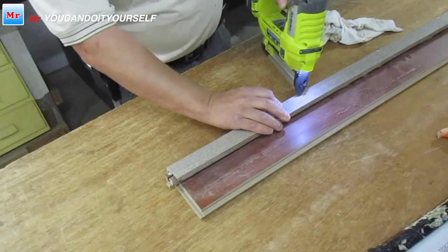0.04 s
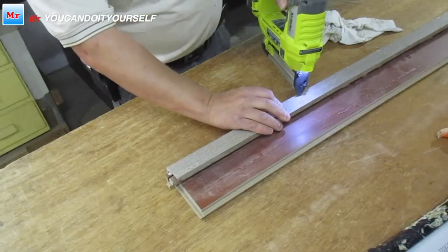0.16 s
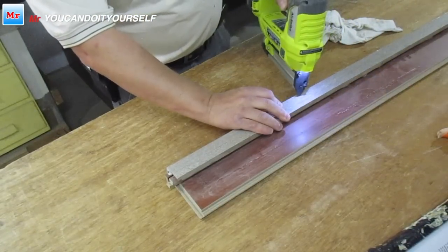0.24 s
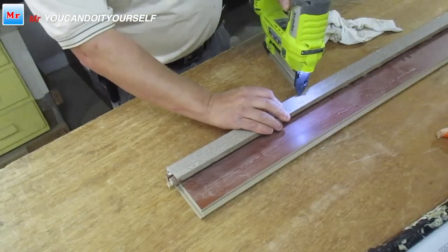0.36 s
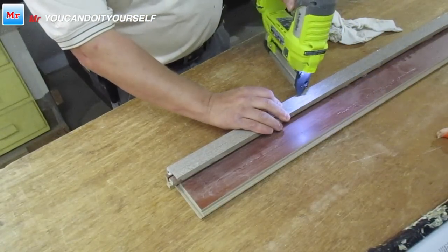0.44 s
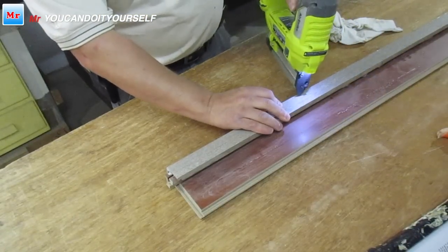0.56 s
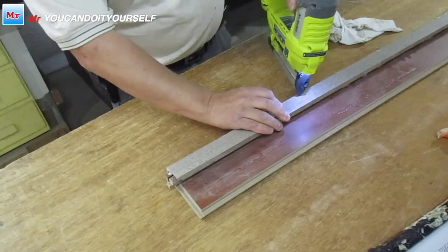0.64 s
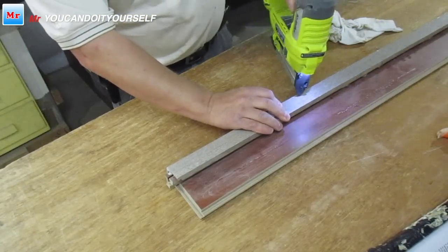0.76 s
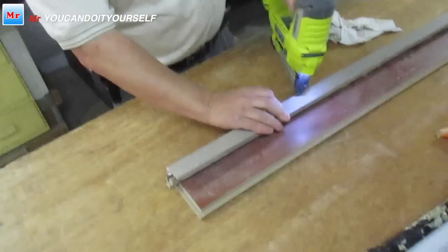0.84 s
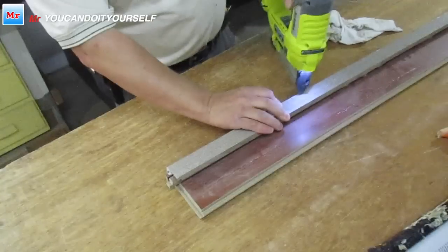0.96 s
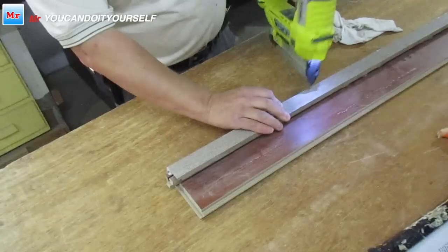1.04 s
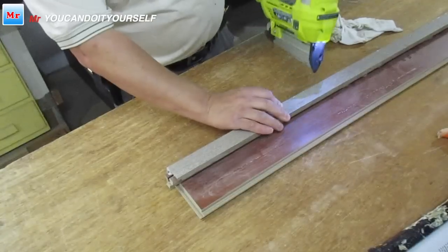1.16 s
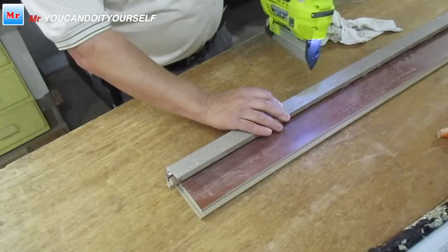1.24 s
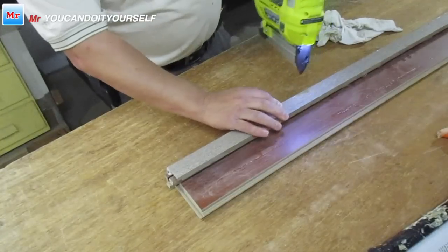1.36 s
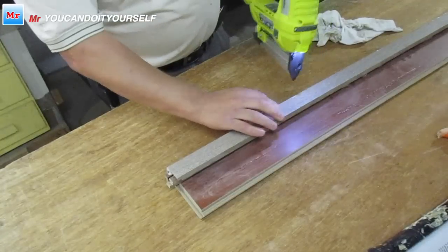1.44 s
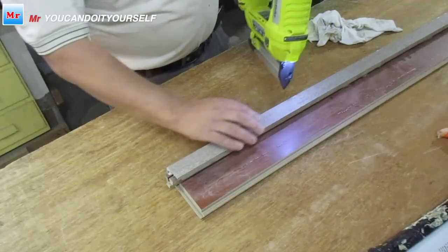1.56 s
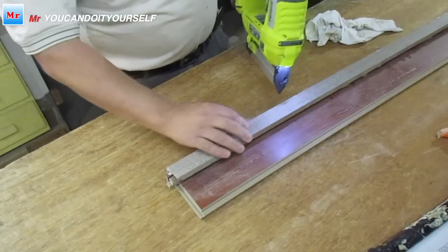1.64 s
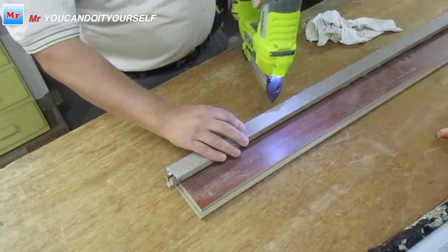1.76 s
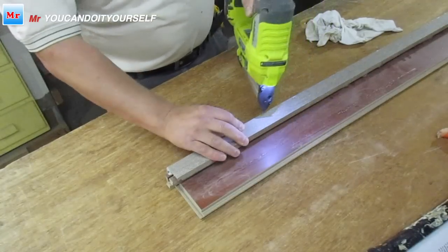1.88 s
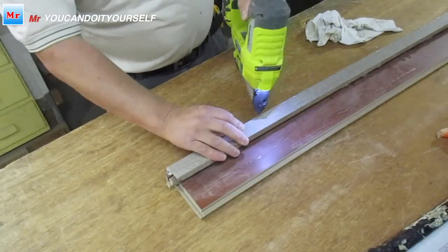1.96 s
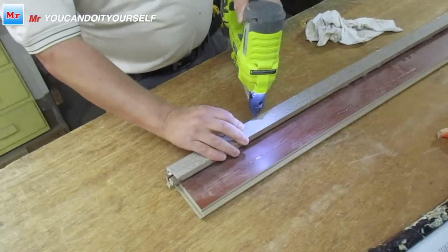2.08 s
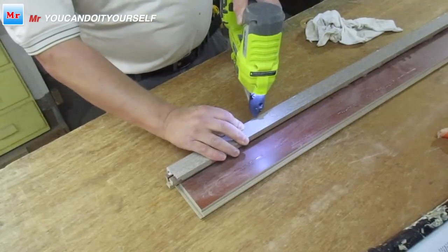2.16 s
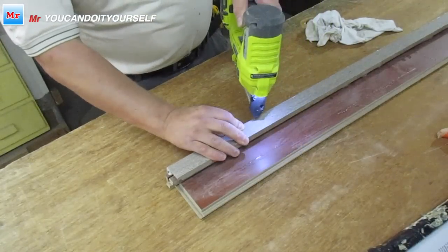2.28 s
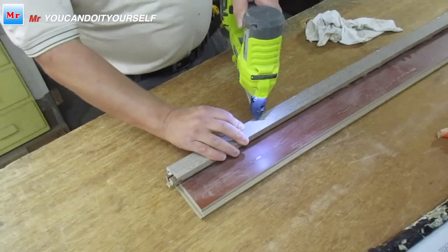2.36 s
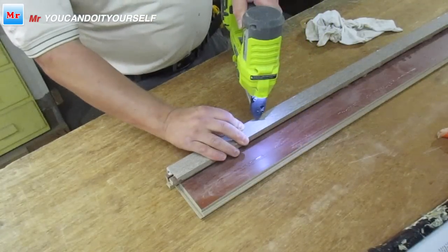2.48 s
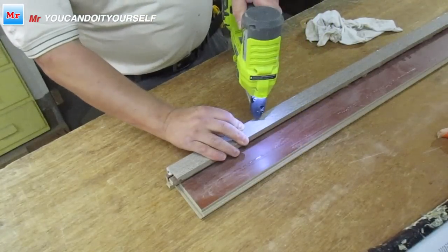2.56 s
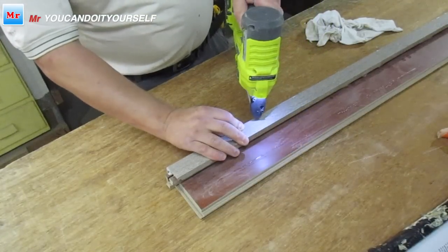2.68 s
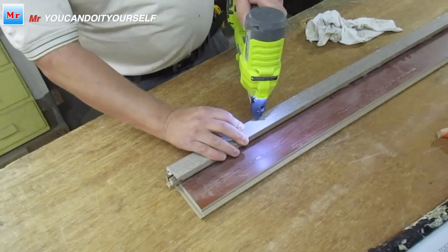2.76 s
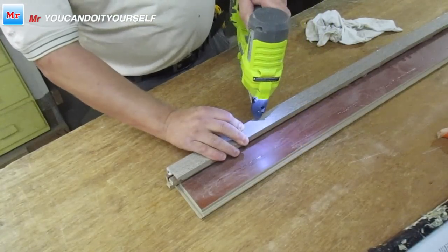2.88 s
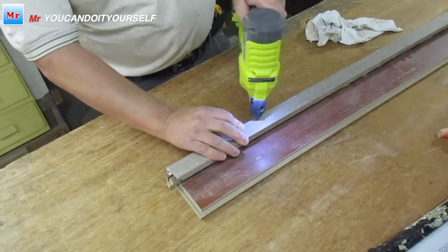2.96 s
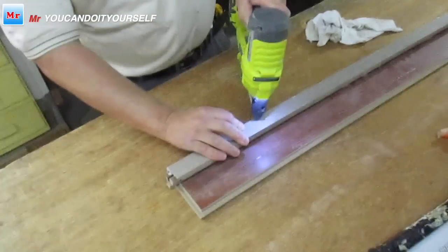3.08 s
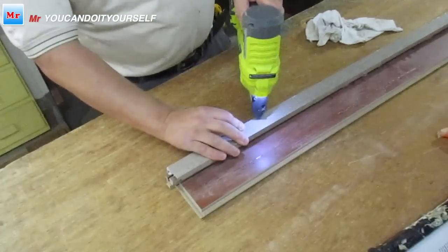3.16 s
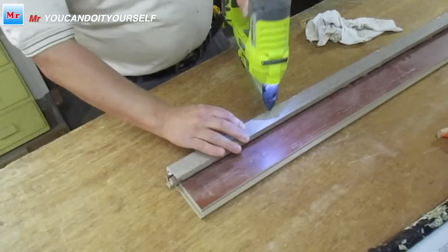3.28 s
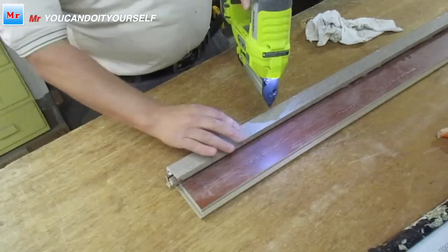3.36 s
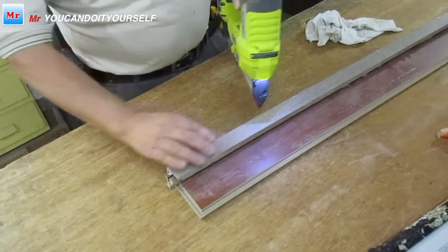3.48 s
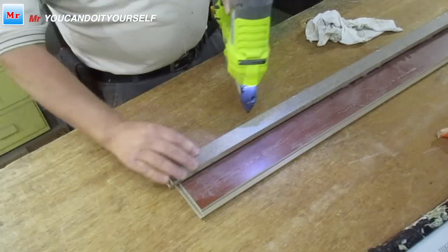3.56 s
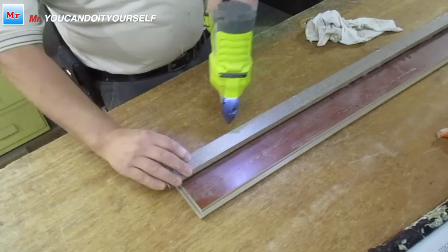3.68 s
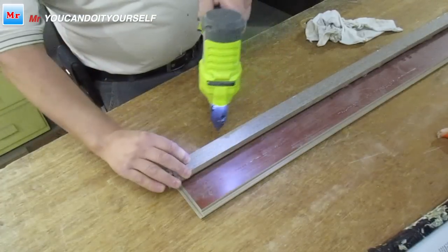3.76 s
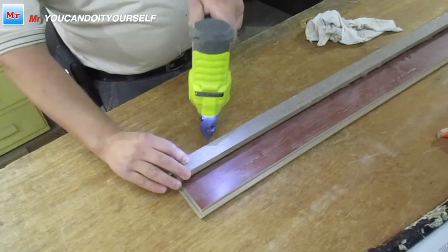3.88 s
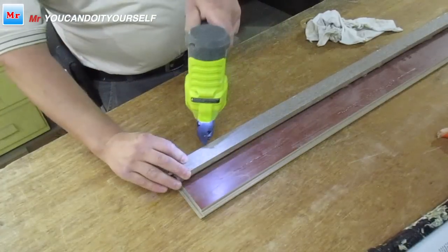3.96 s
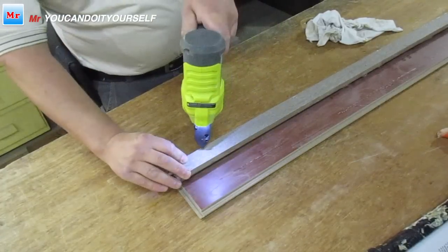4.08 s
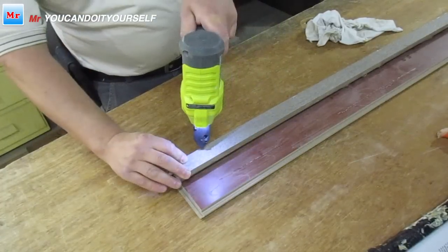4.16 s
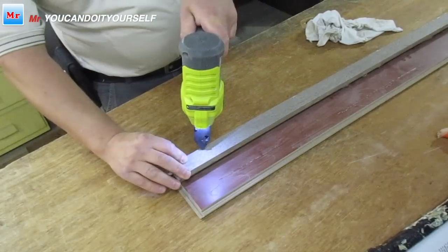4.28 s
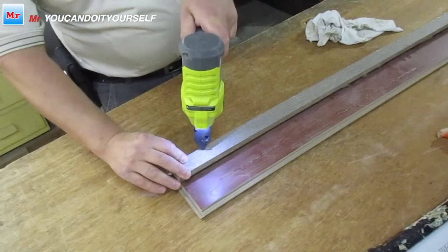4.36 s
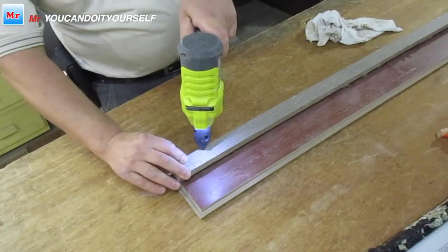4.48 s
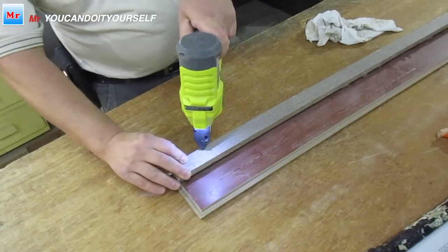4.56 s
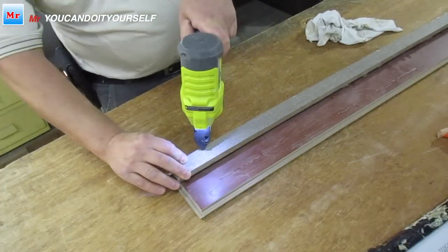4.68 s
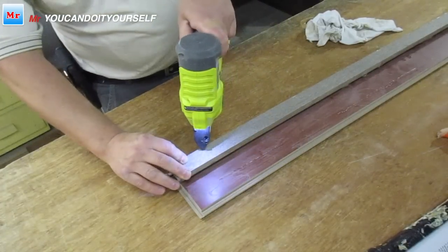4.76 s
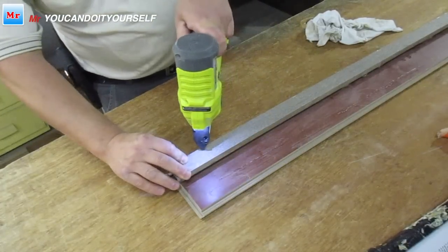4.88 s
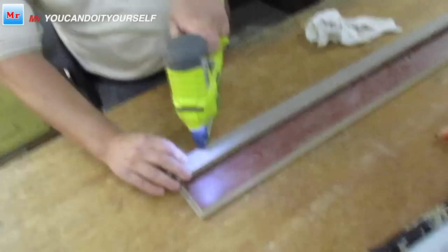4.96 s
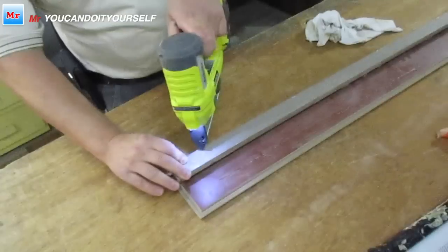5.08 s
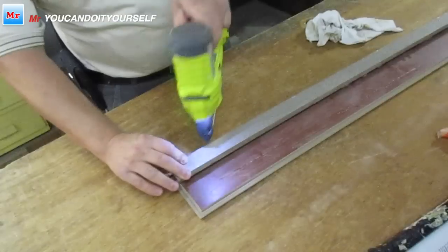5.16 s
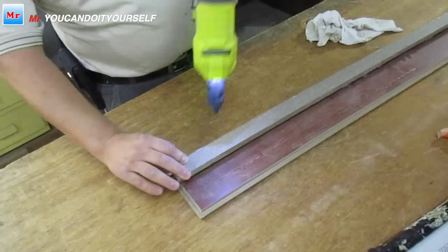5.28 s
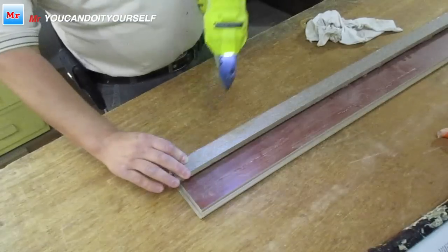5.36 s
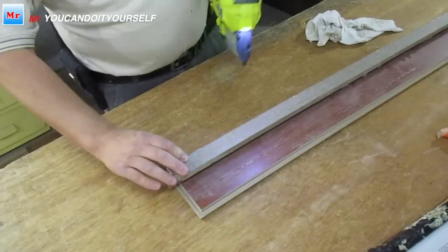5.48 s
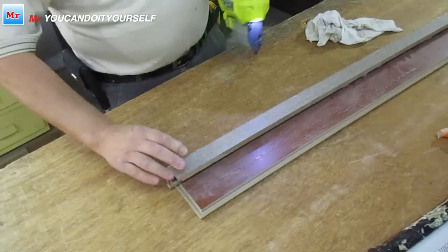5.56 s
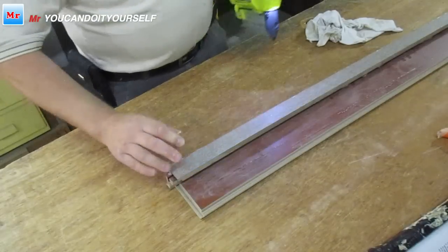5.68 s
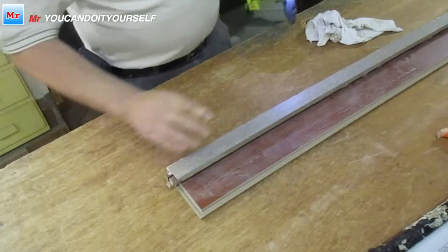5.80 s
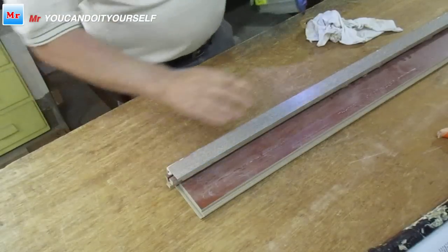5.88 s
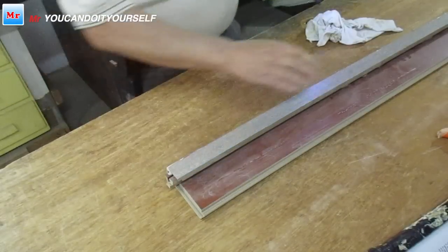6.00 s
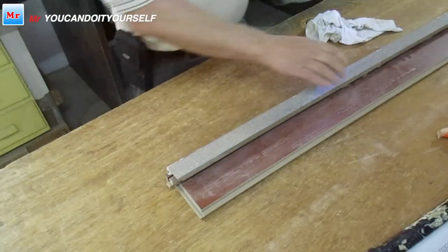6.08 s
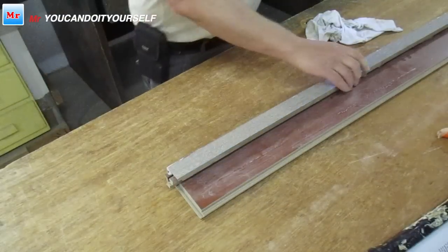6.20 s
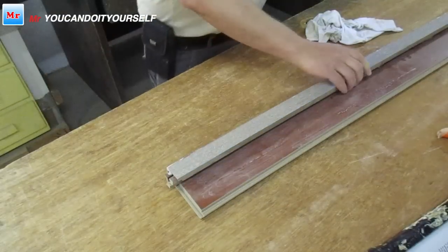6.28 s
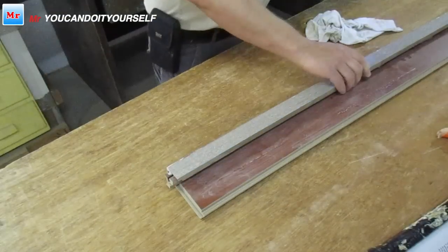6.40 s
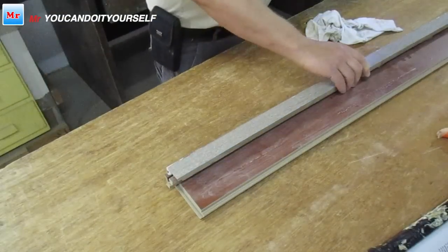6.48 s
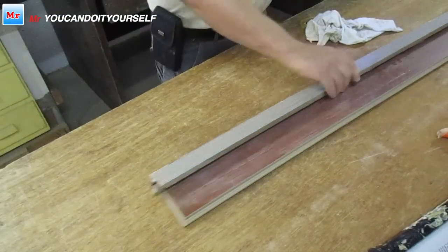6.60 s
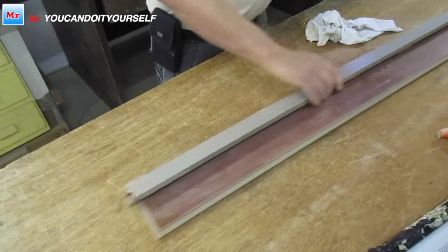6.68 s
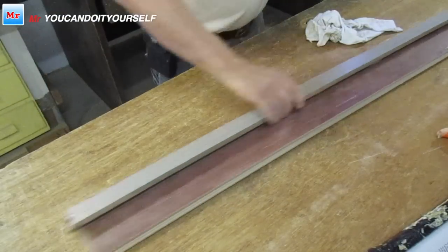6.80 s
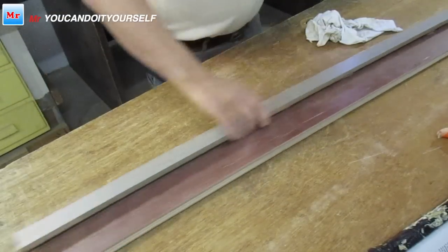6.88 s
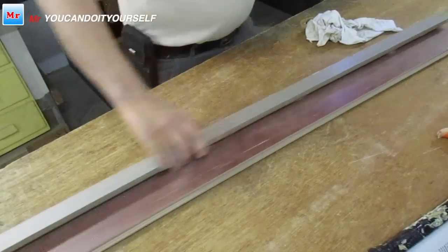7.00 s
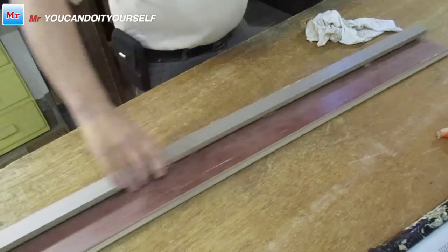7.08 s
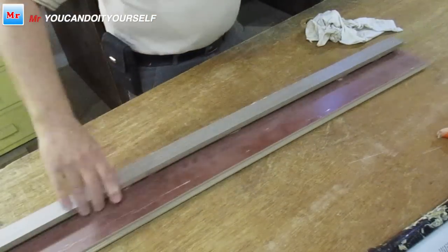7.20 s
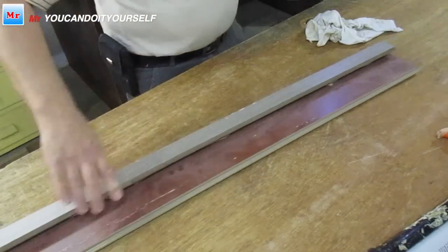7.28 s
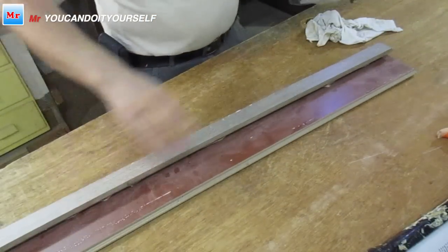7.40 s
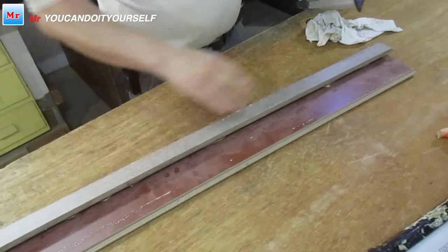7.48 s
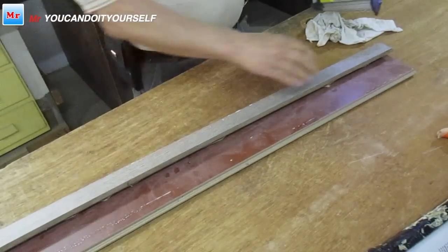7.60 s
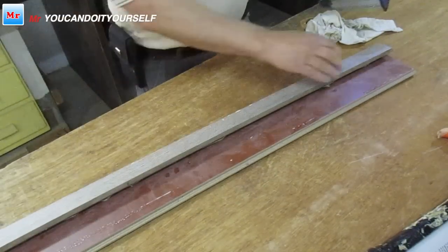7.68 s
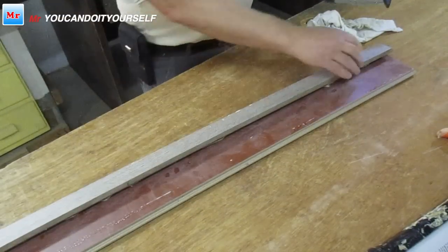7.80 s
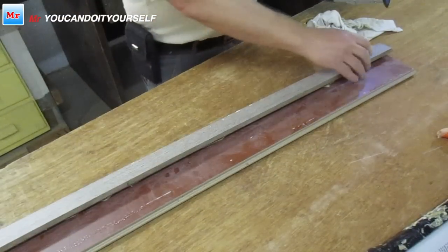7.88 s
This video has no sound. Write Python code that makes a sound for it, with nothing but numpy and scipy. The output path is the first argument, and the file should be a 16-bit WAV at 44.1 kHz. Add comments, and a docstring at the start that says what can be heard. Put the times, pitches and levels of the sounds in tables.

```python
"""A cordless pin nailer fixes a thin strip on a wooden bench in a bare, ringing workshop with a faint hum.
Three times the nose is set down, the trigger clicks, a geared motor winds the piston against an air
spring and the driver snaps a pin home (0.9, 3.0, 5.0 s). At 6.1 s a hand taps the strip.
From 6.6 s the workpiece slides along the bench, rubbing and faintly squeaking. Fingers brush it last."""
import sys
import numpy as np
from scipy import signal
from scipy.fft import rfft, irfft
from scipy.io import wavfile

SR = 44100
rng = np.random.default_rng(int(sys.argv[2]) if len(sys.argv) > 2 else 0)


def wav_out(sig):
    """Save sig, one row per channel (or a flat mono array), as 16-bit PCM at SR to the path in sys.argv[1]."""
    wavfile.write(sys.argv[1], SR, np.round(np.clip(np.atleast_2d(sig).T, -1, 1) * 32767).astype(np.int16))


N = 350154
T = np.arange(N) / SR

# firings: (time [s], blow [dB], room [dB], crack in room [dB], gears [dB], whine [dB],
#           wind-up length [s], trigger time [s], trigger [dB])
SHOTS = [(0.853, -2.5, -11.5, -14, -2, -0.5, 0.15, .629, -24.5),
         (3.0442, -3, -12.5, -3, -7.5, -10.5, .1493, 2.814, -42),
         (5.0208, -4, -11, 2.5, -10.5, -16, .1487, 4.7865, -33)]
# rubbing on wood: (frequency [Hz], level [dB])
RUB_SPECTRUM = [(40, -18), (120, -9.5), (200, 1.5), (450, 5.5), (800, 6), (1300, 0.5), (2200, -6),
                (3500, -12.5), (6000, -32.5), (10000, -27.5), (15000, -40)]


def undb(db):
    """Decibels to gain."""
    return 10 ** (np.asarray(db) / 20)


def at_hz(points, f):
    """Interpolate (Hz, value) points over log frequency."""
    hz, value = np.transpose(points)
    return np.interp(np.log(np.maximum(f, 1)), np.log(hz), value)


def colour(x, spectrum, size=4096):
    """Minimum-phase filter of unit power with the given spectrum."""
    gain = undb(at_hz(spectrum, np.fft.rfftfreq(size, 1 / SR)))
    cepstrum = irfft(np.log(gain / np.sqrt(np.mean(gain ** 2))))
    cepstrum[1:size // 2] *= 2
    cepstrum[size // 2 + 1:] = 0
    return signal.fftconvolve(x, irfft(np.exp(rfft(cepstrum))))[:len(x)]


def fade(t, t60_s):
    """Exponential decay from t = 0."""
    return (t >= 0) * np.exp(-np.log(1000) * np.maximum(t, 0) / t60_s)


def gate(start_s, end_s, attack_s, release_s):
    """Rise from start_s, hold, fall after end_s."""
    return np.clip((T - start_s) / attack_s, 0, 1) * np.clip(1 - (T - end_s) / release_s, 0, 1)


def noise(t):
    """White noise as long as t."""
    return rng.standard_normal(len(t))


def wander(t, rate_hz):
    """Random values joined by ramps, spread near 1."""
    steps = rng.standard_normal(len(t) // 8)
    return np.interp(t * rate_hz, np.arange(len(steps)), steps)


def pulse(t, db):
    """Impulse at the start of t."""
    return undb(db) * signal.unit_impulse(len(t))


def ring(t, modes):
    """Decaying sines of a struck resonator."""
    return sum(undb(db) * np.sin(2 * np.pi * hz * t) * fade(t, t60_s) for hz, db, t60_s in modes)


def add(out, at_s, x):
    """Mix x into out."""
    i = max(int(at_s * SR), 0)
    out[i:i + len(x)] += x[:N - i]


def background(floor_db=-58, hum_hz=136.0, hum_db=-62):
    """Steady room noise and a faint, wavering hum."""
    # room noise: (frequency [Hz], level [dB])
    floor_spectrum = [(15, -43), (25, -0.5), (86, -5.5), (133, 5.5), (253, -15.5), (349, -7), (567, -16.5),
                      (648, -31.5), (722, -10.5), (1490, -13), (1620, -9.5), (2120, -25), (2770, -23),
                      (14300, -39), (15500, -44.5)]
    hum = np.sin(2 * np.pi * hum_hz * T + .4 * wander(T, 4)) * undb(2 * wander(T, 0.97))
    return undb(floor_db) * colour(noise(T), floor_spectrum) + undb(hum_db) * hum


def room_response(bass_build_s=0.019, treble_build_s=0.00094, bands=18):
    """Diffuse reflections: lows come late and stay, treble dies first."""
    # reverberation: (frequency [Hz], t60 [s])
    decay_times = [(60, 1.2), (150, 2.33), (300, 1.71), (700, 1.75), (1800, 1.516), (4800, 1.1),
                   (8000, 0.69), (14000, 0.46)]
    t = T[:int(2.5 * SR)]
    spectrum = rfft(noise(t))
    log_hz = np.log(np.maximum(np.fft.rfftfreq(len(t), 1 / SR), 1))
    centres_hz = np.geomspace(50, 16000, bands)
    tail = 0
    for hz, pick in zip(centres_hz, np.eye(bands)):
        band = irfft(spectrum * np.interp(log_hz, np.log(centres_hz), pick), len(t))
        build_s = at_hz([(600, bass_build_s), (4000, treble_build_s)], hz)
        tail += band * fade(t, at_hz(decay_times, hz)) * (1 - np.exp(-t / build_s))
    return tail / np.sqrt(np.sum(tail ** 2))


def brush(attack_s=0.017, release_s=0.077):
    """Skin rubs and whispers along strip and grip."""
    # finger strokes: (start [s], length [s], rub [dB], whisper [dB])
    strokes = [(0, 0.69, -56, -65), (1.479, 0.35, -74, -67.5), (2.733, 0.25, -55.5, -69),
               (4.666, 0.18, -65.5, -72), (7.57, .42, -73.5, -65.5)]
    # skin whisper: (frequency [Hz], level [dB])
    whisper_spectrum = [(3000, 0), (7500, -1), (11000, -8.5), (15000, -15)]
    rub, whisper = colour(noise(T), RUB_SPECTRUM), colour(noise(T), whisper_spectrum)
    skin = np.zeros(N)
    for at_s, length_s, rub_db, whisper_db in strokes:
        touch = gate(at_s, at_s + length_s - release_s, attack_s, release_s)
        skin += touch * (undb(rub_db) * rub + undb(whisper_db) * whisper)
    return skin


def squeak(start_s=6.62, peak_s=6.97, end_s=7.06, start_hz=3250, end_hz=3530, third_db=-50, jitter=0.033):
    """An edge sticks and slips as the board gathers speed; only partials 3 and 4 sing."""
    slip_hz = np.interp(T, [start_s, end_s], [start_hz, end_hz])
    phase = 2 * np.pi * np.cumsum(slip_hz * (1 + jitter * wander(T, 1500))) / SR
    swell = np.interp(T, [start_s, peak_s, end_s], [0, 1, 0])
    return undb(third_db) * swell * (np.sin(3 * phase) + undb(-8) * np.sin(4 * phase))


def slide(catch_db=0.5, grain_db=1.5, attack_s=0.042, release_s=.045):
    """The board catches and slips on the bench: tiny impacts sound the wood, fine grain hisses."""
    # course of the slide: (time [s], rub [dB], hiss [dB])
    course = [(6.6, -43.5, -59), (6.656, -35, -54), (6.904, -42, -43.5), (6.954, -31.5, -37),
              (7.044, -27, -38), (7.254, -35.5, -48), (7.316, -39.5, -52), (7.34, -40, -51)]
    # grain hiss: (frequency [Hz], level [dB])
    hiss_spectrum = [(1000, -1), (2500, 5), (5000, 3), (8000, -1.5), (10200, -8.5), (12600, -9),
                     (15500, -20)]
    times_s, rub_db, hiss_db = np.transpose(course)
    friction = undb(catch_db * wander(T, 39) + grain_db * wander(T, 900))
    friction *= gate(times_s[0] - attack_s, times_s[-1], attack_s, release_s)
    rub = colour(noise(T) * friction * undb(np.interp(T, times_s, rub_db)), RUB_SPECTRUM)
    hiss = colour(noise(T) * friction * undb(np.interp(T, times_s, hiss_db)), hiss_spectrum)
    return rub + hiss


def tap(at_s=6.1098, tap_db=-30, send_db=-16):
    """A hand takes the strip with one bright tick; a single pulse excites the room."""
    # contact: (frequency [Hz], level [dB])
    tap_spectrum = [(200, -18), (1000, 3.5), (1700, 3.5), (3200, -1), (5000, -2.5), (7500, -3),
                    (10000, -4.5), (15500, -16)]
    # strip resonances: (frequency [Hz], level [dB], t60 [s])
    strip_modes = [(1680, -8, 0.033), (2870, -10, .04), (4002, -12, .03), (4800, -11, 0.024)]
    direct, send = np.zeros((2, N))
    t = T[:SR // 8]
    contact = colour(noise(t) * fade(t, .012), tap_spectrum)
    add(direct, at_s, undb(tap_db) * (contact + undb(-3) * ring(t, strip_modes)))
    add(send, at_s, colour(pulse(t, send_db), tap_spectrum))
    return direct, send


def knocks(push_db=9, shake_db=-15, bench_t60_s=0.16, tick_t60_s=0.016):
    """The padded nose lands: dull thud, contact tick, ringing bench top."""
    # landings: (time [s], level [dB], relative tick [dB], relative ring [dB])
    landings = [(.002, -31.5, -36, -10.5), (.058, -35, 1, -14), (2.415, -26, -2.5, -7),
                (4.3091, -33, -9.5, -2)]
    # bench thud and contact tick: (frequency [Hz], level [dB])
    thud_spectrum = [(25, -7.5), (65, 1), (140, 2.5), (260, -7.5), (500, -11), (900, -17.5), (1600, -27),
                     (4000, -40.5), (10000, -69.5)]
    tick_spectrum = [(300, -26), (900, 26), (1900, 13), (4200, 1), (6000, -16), (15000, -51)]
    # bench top resonances: (frequency [Hz], level [dB], t60 [s])
    bench_modes = [(65, -22, .35), (137, -8, 0.12), (245, -1, 0.042), (472, -12, 0.1)]
    thuds, contacts = np.zeros((2, N))
    t = T[:SR // 2]
    for at_s, db, tick_db, ring_db in landings:
        tick = undb(tick_db) * colour(noise(t) * fade(t, tick_t60_s), tick_spectrum) / 2
        shake = undb(shake_db) * noise(t) * fade(t, bench_t60_s)
        thud = colour(pulse(t, push_db) + shake, thud_spectrum)
        top = undb(ring_db) * ring(t, bench_modes)
        add(thuds, at_s, undb(db) * (thud + undb(-3.5) * top))
        add(contacts, at_s, undb(db) * (tick + undb(-5) * top))
    return thuds, contacts


def click_events(spring_lag_s=.016, switch_lead_s=.0345, bounce_s=.005, latch_lag_s=0.081, idle_db=-26):
    """Click sequence of the mechanism: (time [s], level [dB], relative spring ring [dB])."""
    # housing clicks as the tool is pressed down: (time [s], level [dB])
    presses = [(.372, -38.5), (2.721, -31.5), (4.567, -48.5)]
    events = [(at_s, db, idle_db) for at_s, db in presses]
    for shot_s, _, _, _, gears_db, _, wind_s, trigger_s, trigger_db in SHOTS:
        start_s = shot_s - wind_s
        switch_s = start_s - switch_lead_s
        events += [(trigger_s, trigger_db, idle_db),
                   (trigger_s + spring_lag_s, gears_db - 38, -3),  # trigger spring seats
                   (switch_s, gears_db - 23, -13),
                   (switch_s + bounce_s, gears_db - 21, -13),
                   (start_s, gears_db - 15.5, -18),  # gears engage
                   (shot_s + latch_lag_s, -27, idle_db)]  # piston latches
    return events


def clicks(snap_t60_s=0.012, rise_s=0.0022, scuff_db=-17, scuff_t60_s=0.15,
           spring_hz=10300, spring_t60_s=0.021):
    """Plastic parts snap into place and scuff; a small spring rings along."""
    # plastic click: (frequency [Hz], level [dB])
    click_spectrum = [(100, -9), (600, -4.5), (1300, 1.5), (2600, 1.5), (4200, -3.5), (5700, -6),
                      (7500, -9.5), (11000, -14.5), (15500, -18)]
    snaps, springs = np.zeros((2, N))
    t = T[:SR // 6]
    contact = (fade(t, snap_t60_s) + undb(scuff_db) * fade(t, scuff_t60_s)) * (1 - np.exp(-t / rise_s))
    for at_s, db, ring_db in click_events():
        add(snaps, at_s, undb(db) * colour(noise(t) * contact, click_spectrum))
        add(springs, at_s, ring(t, [(spring_hz, db + ring_db, spring_t60_s)]))
    return snaps, springs


def wind_up(t, length_s, free_mesh_hz=5926, start_deficit=.29, spin_up_s=.029, load_sag=.21):
    """One piston stroke: slack is taken up early; air is squeezed late and slows the gears."""
    travel = np.minimum(t / length_s, 1)
    slack, squeeze = (1 - travel) ** 2, travel ** 6
    mesh_hz = free_mesh_hz * (1 - start_deficit * np.exp(-t / spin_up_s) - load_sag * squeeze)
    return slack, squeeze, mesh_hz


def motor(housing_hz=5680, housing_width_hz=280, shaft_teeth=21, tooth_db=2.5, stop_t60_s=0.0087):
    """Gear teeth whine and rasp as the motor speeds up, then labours against the air spring."""
    # tooth rasp and strain under load: (frequency [Hz], level [dB])
    rasp_spectrum = [(100, -16), (500, 0.5), (1500, -3.5), (2900, -0.5), (4000, -3.5), (5600, -3),
                     (7200, -6), (8500, -4.5), (10500, -14.5), (13000, -12), (15500, -25)]
    strain_spectrum = [(50, -17.5), (140, 5), (300, 2.5), (550, -1), (1000, -4), (2100, 1.5), (3500, -32),
                       (8000, -27.5)]
    rasps, whines = np.zeros((2, N))
    t = T[:SR // 4]
    orders = np.arange(5, 24)
    for shot_s, _, _, _, gears_db, whine_db, wind_s, _, _ in SHOTS:
        slack, squeeze, mesh_hz = wind_up(t, wind_s)
        running = fade(np.maximum(t - wind_s, 0), stop_t60_s)
        mesh_phase = 2 * np.pi * np.cumsum(mesh_hz * (1 + .034 * wander(t, 1300))) / SR
        shaft_phase = mesh_phase / shaft_teeth
        whine = np.sin(mesh_phase) * undb(3 * wander(t, 400) + 2.5 * np.sin(shaft_phase))
        resonance = undb(-16 - 16 * slack) / np.hypot(1, 2 * (mesh_hz - housing_hz) / housing_width_hz)
        # second gear stage: half the mesh rate
        stage = np.sin(np.pi * np.cumsum(mesh_hz * (1 + .03 * wander(t, 900))) / SR)
        # uneven teeth: multiples of the shaft rate
        growl = sum(wander(t, 70) * np.sin(k * shaft_phase + 2 * np.pi * rng.random()) for k in orders)
        growl /= np.sqrt(len(orders))
        gear_tones = undb(-42 * slack) * (undb(-21.5) * stage + undb(-18.5) * growl)
        teeth = undb(tooth_db * (np.sin(shaft_phase) + wander(t, 1200)))
        rasp = undb(-18.4 - 12.5 * slack) * colour(teeth * noise(t), rasp_spectrum)
        strain = undb(-31 + 14 * squeeze) * colour(teeth * noise(t), strain_spectrum)
        # housing rings once as the gears engage
        engage = undb(-13.5) * np.sin(2 * np.pi * housing_hz * t) * fade(t - .002, 0.011)
        add(rasps, shot_s - wind_s, running * undb(gears_db) * (rasp + strain + gear_tones))
        add(whines, shot_s - wind_s, running * undb(whine_db) * (resonance * whine + engage))
    return rasps, whines


def shots(thump_hz=165, strike_lag_s=.0042, strike_width_s=0.0019, wood_t60_s=0.14, blast_boost_db=25):
    """The piston is let go with a kick; the driver strikes the pin; housing and bench rattle out."""
    # sharp crack and low blast: (frequency [Hz], level [dB])
    crack_spectrum = [(100, -5.5), (500, 5.5), (1100, -3), (2100, 6.5), (3200, -3.5), (5000, -1),
                      (8000, 0.5), (11000, -8.5), (15500, -17)]
    blast_spectrum = [(40, -19), (90, -6.5), (150, 2), (280, -4.5), (400, 0), (580, 3), (1050, -5.5),
                      (1800, -6), (2800, -17), (3900, -14), (4600, -12.5), (5400, -17), (8000, -17.5),
                      (15000, -39.5)]
    # room standing waves and steel driver resonances: (frequency [Hz], level [dB], t60 [s])
    room_modes = [(134.8, -18, 2.73), (176, -24, 3.4), (198, -38.5, 2.2), (358, -39, 1.9),
                  (518, -33.5, 2.9), (551, -36, 1.9), (678, -33, 1.8), (813, -28.5, 0.68)]
    driver_modes = [(4540, -35, .7), (4680, -37, .9), (4770, -36, .95)]
    direct, send, standing_waves = np.zeros((3, N))
    t, tail_t = T[:SR // 5], T[:3 * SR]
    drone, steel = ring(tail_t, room_modes), ring(tail_t, driver_modes)
    thump = undb(-4) * np.sin(2 * np.pi * thump_hz * t) * np.exp(-((t - .003) / 0.0052) ** 2)
    release = undb(-10) * fade(t, 0.028)
    strike = undb(-5) * np.exp(-((t - strike_lag_s) / strike_width_s) ** 2)
    rattle = undb(-19) * fade(t - strike_lag_s, .04)
    for at_s, blow_db, room_db, crack_db, *_ in SHOTS:
        wood = undb(-17) * colour(noise(t) * fade(t, wood_t60_s), blast_spectrum)
        crack = colour((release + strike + rattle) * noise(t), crack_spectrum)
        add(direct, at_s, undb(blow_db) * (thump + crack + wood))
        add(direct, at_s + strike_lag_s, undb(blow_db) * steel)
        # to the room the shot is one pressure pulse
        add(send, at_s, colour(pulse(t, room_db + blast_boost_db), blast_spectrum))
        add(send, at_s, colour(pulse(t, crack_db), crack_spectrum))
        add(standing_waves, at_s, undb(room_db) * drone)
    return direct, send, standing_waves


def scene():
    """Mono mix of nailer, handling, reverberation and background."""
    shot, shot_send, standing_waves = shots()
    thud, contact = knocks()
    click, spring = clicks()
    tick, tick_send = tap()
    rasp, whine = motor()
    scrape = undb(-3) * slide()
    nailer_send = shot_send + undb(-8) * rasp + undb(-19) * whine + undb(-4) * click
    handling_send = tick_send + undb(6) * thud + scrape
    room = signal.fftconvolve(nailer_send + handling_send, room_response())[:N] + standing_waves
    nailer = shot + rasp + whine + click + spring
    handling = thud + contact + tick + scrape + squeak() + brush()
    return (nailer + handling + room + background())[None]


def record(dry, notch_hz=7900, notch_q=22, top_hz=15800):
    """Narrow dip of the microphone port, overload on the shots, steep low-pass."""
    notched = signal.lfilter(*signal.iirnotch(notch_hz, notch_q, fs=SR), dry)
    lowpass = signal.ellip(10, .1, 70, top_hz, fs=SR, output="sos")
    return signal.sosfilt(lowpass, np.clip(notched, -1, 1))


dry = scene()
out = record(dry)
wav_out(out)
```